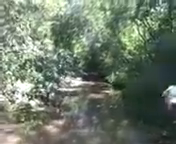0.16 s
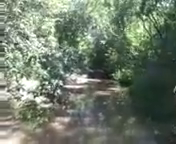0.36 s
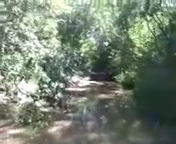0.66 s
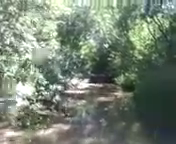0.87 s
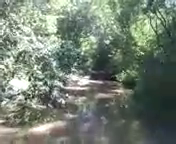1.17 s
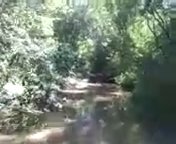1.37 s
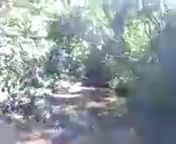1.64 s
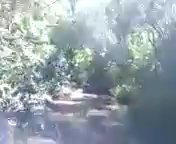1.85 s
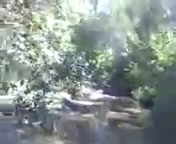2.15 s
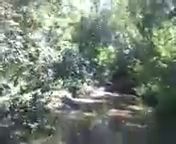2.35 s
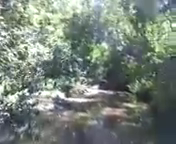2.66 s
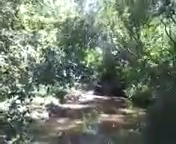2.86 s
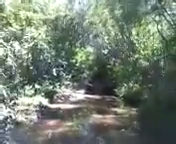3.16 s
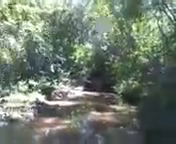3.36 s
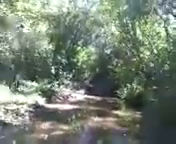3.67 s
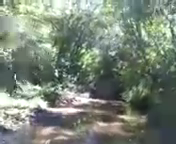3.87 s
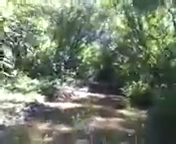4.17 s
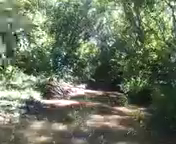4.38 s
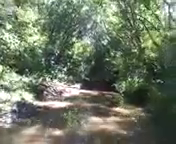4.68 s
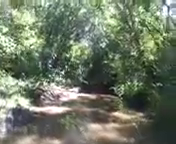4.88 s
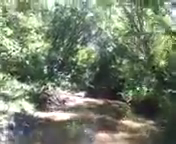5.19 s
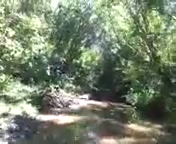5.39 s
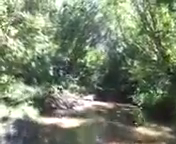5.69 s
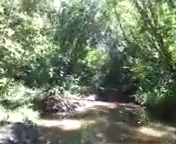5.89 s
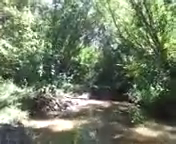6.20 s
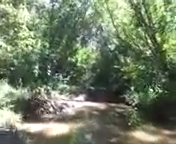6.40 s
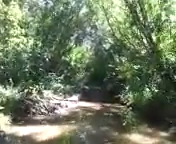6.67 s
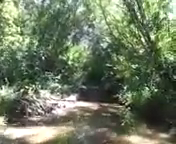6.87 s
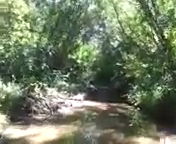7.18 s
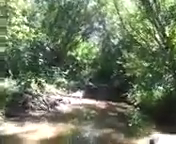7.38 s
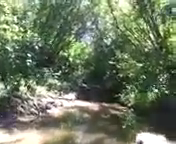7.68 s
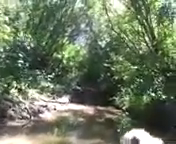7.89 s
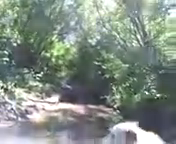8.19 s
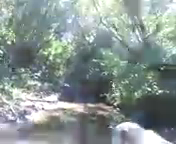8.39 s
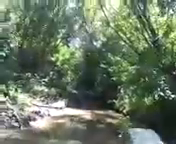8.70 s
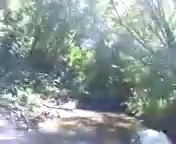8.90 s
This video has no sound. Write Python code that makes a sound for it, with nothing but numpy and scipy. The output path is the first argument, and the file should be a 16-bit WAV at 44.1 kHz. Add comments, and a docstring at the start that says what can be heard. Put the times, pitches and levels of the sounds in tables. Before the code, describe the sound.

Close, irregular splashes sound as feet and paws step through shallow water in a wooded creek. Each step slaps the surface, gurgles and throws drops that patter back. After about four seconds the wading turns into denser, louder sloshing, and soon gusts of wind buffet the microphone with low rumbles. A soft hiss of water and leaves lies underneath.

```python
"""A shallow creek in the woods, with paws and feet wading through it.
Each step slaps the water and traps air, which rings as bubbles or gulps as a hole closes.
Dragging legs churn the water and throw up spray that patters back down.
Behind them the creek and the leaves hiss, and wind buffets and thumps a small camera's microphone."""
import sys
import numpy as np
from scipy import signal
from scipy.fft import rfft, irfft, next_fast_len
from scipy.io import wavfile
from scipy.ndimage import uniform_filter1d, map_coordinates

SR = 44100
rng = np.random.default_rng(int(sys.argv[2]) if len(sys.argv) > 2 else 0)


def digitize_waveform(pressure):
    """Quantize a signal to 16-bit integers and store it at the path in sys.argv[1].

    Rows of a 2-D input are taken as channels; values are limited to [-1, 1].
    """
    field = np.atleast_2d(pressure).T
    bounded = np.clip(field, -1, 1)
    quanta = np.round(bounded * 32767).astype(np.int16)
    wavfile.write(sys.argv[1], SR, quanta)


N = 399105

# Water hitting water: start_s, level_db, spatter_db (compared with the slap)
SLAPS = [(0.316, -24, -11), (0.473, -32, 2.5), (1.0504, -20, -7), (1.068, -13.5, 0), (1.201, -24, -3),
         (1.2674, -23, -12), (1.287, -16, -5), (1.316, -25, -15), (1.342, -21, -1.5), (1.39, -30.5, -16),
         (1.7446, -6.5, -8), (1.934, -13.5, -5.5), (2.232, -34, 5), (2.688, -26.5, -16), (2.8563, -21, -15),
         (3.324, -35, -5), (4.0598, -10, -11), (4.1365, -21, -8), (4.3338, -14.5, -7), (4.3883, -25, -10),
         (4.3984, -17, -14), (4.4474, -26, -8), (4.47, -20, 4), (4.6455, -42, -11), (4.705, -29, -16),
         (4.72, -26, -8), (4.7414, -20, -22), (4.8278, -23, 1), (4.9466, -17.5, 0), (4.999, -17, -13),
         (5.04, -18, 1), (5.19, -19, -8), (5.2306, -15.5, 3), (5.367, -13, -25), (5.4836, -13.5, -3),
         (5.616, -24.5, -23), (5.666, -23.5, -19), (5.698, -23, 3), (6.1123, -24, -5), (6.141, -22, -18),
         (6.162, -14.5, -2), (6.1875, -19.5, 2), (6.227, -13, -9), (6.6027, -14.5, 3.5),
         (6.7041, -9.5, -19), (6.8134, -26, -12), (6.95, -13.5, -7), (7.121, -22, -23),
         (7.1528, -18.5, -24), (7.1982, -8.5, -19), (7.5248, -27, -1), (7.568, -17.5, -8),
         (7.871, -8.5, -23), (8.2227, -23.5, -4), (8.264, -30, -3), (8.4445, -43, 25), (8.5847, -15.5, -4),
         (8.6274, -11.5, -16), (8.649, -18, -14), (8.735, -22.5, 2.5), (9.0337, -27, -9)]
# Short ringing notes: bubbles in the water, and a few low thumps of wind on the microphone:
# start_s, pitch_hz, level_db, life_cycles
BUBBLES_AND_THUMPS = [(0.33, 1450, -37, 12.8), (1.07, 3240, -24, 11), (1.146, 379, -35, 3.4),
                      (1.171, 3614, -23, 12), (1.1801, 723, -30, 11), (1.205, 470, -28, 3.7),
                      (1.235, 2000, -29, 8), (1.262, 1690, -20.5, 13.4), (1.267, 1130, -20.5, 5.8),
                      (1.288, 397, -24, 1.7), (1.2895, 2380, -23, 8.6), (1.3183, 4106, -26, 7),
                      (1.3427, 1100, -15, 8.3), (1.744, 3000, -12.5, 13), (1.747, 4480, -9, 7.5),
                      (1.774, 1110, -36, 7.2), (1.7772, 3550, -31, 20), (1.852, 960, -36, 4.3),
                      (1.866, 900, -37, 6.3), (1.913, 826, -32, 5), (1.9286, 1610, -14.5, 2.9),
                      (1.9391, 700, -22.5, 3.2), (1.9491, 3270, -25, 6.4), (1.961, 564, -31, 5.5),
                      (1.978, 1240, -27.5, 4), (2.036, 1930, -35, 10), (2.07, 1980, -32.5, 13),
                      (2.086, 1290, -28, 5), (2.119, 1020, -31, 5.4), (2.1573, 610, -26.5, 1.8),
                      (2.2363, 1110, -32.5, 4.5), (2.513, 1830, -28.5, 14), (2.6872, 1090, -20.5, 2.1),
                      (2.689, 3600, -22.5, 3.2), (2.819, 1210, -19, 1.8), (2.823, 431, -28.5, 9.5),
                      (2.855, 255, -32.5, 1.8), (2.879, 795, -25, 7.5), (2.9733, 830, -25.5, 2.7),
                      (3.074, 2920, -26.5, 12), (3.1414, 3259, -26.5, 5.3), (3.3158, 1730, -13.5, 3.1),
                      (3.325, 1346, -17.5, 6), (3.344, 2420, -20, 3.2), (3.5333, 946, -31, 12),
                      (3.5421, 3700, -18.5, 5.5), (3.555, 1420, -22, 7.6), (3.582, 323, -23, 4.6),
                      (3.5808, 590, -20.5, 6.9), (3.584, 1960, -19, 7.3), (3.602, 257, -29, 2.2),
                      (3.605, 1060, -22, 3.3), (3.6595, 1680, -24, 5.7), (3.867, 1270, -29, 6.5),
                      (3.879, 1280, -21.5, 6.8), (3.9195, 500, -23, 2.4), (3.94, 555, -31.5, 15),
                      (4.058, 4200, -23, 6.5), (4.135, 1580, -17, 3), (4.1885, 420, -19, 2.27),
                      (4.3719, 266, -29, 3.2), (4.417, 1380, -23, 6), (4.436, 924, -23, 6.8),
                      (4.4652, 1510, -18, 3.6), (4.4731, 740, -25, 4.1), (4.563, 1720, -22, 4.7),
                      (4.67, 416, -18, 2.3), (4.719, 2780, -14.5, 12), (4.7429, 5180, -10.5, 8.6),
                      (4.7425, 2300, -16, 3.1), (4.9493, 1490, -19.5, 12.5), (5.003, 1790, -12, 5.1),
                      (5.1924, 2600, -11, 3), (5.276, 3670, -23, 10.8), (5.3475, 908, -13.5, 8.3),
                      (5.3653, 392, -29, 2.2), (5.4721, 960, -24.5, 6.1), (5.49, 4988, -35, 6.5),
                      (5.5482, 423, -31.5, 11.3), (5.552, 4780, -20, 15), (5.562, 734, -26, 2.9),
                      (5.629, 543, -31, 9.5), (5.6693, 2340, -16.5, 6.7), (5.726, 1830, -18, 4.8),
                      (5.858, 2400, -23, 4.9), (5.9005, 1600, -25, 8.8), (5.965, 191, -32, 1.2),
                      (5.987, 1350, -27.5, 7.6), (6.001, 233, -22, 0.85), (6.1425, 1540, -15.5, 3.4),
                      (6.249, 188, -22.5, 1.32), (6.2638, 820, -26, 4.1), (6.3168, 2170, -22, 9.8),
                      (6.35, 3375, -25, 4.3), (6.376, 3150, -23, 6.4), (6.437, 680, -22, 2.3),
                      (6.472, 1410, -27, 8.7), (6.5162, 615, -15.5, 3.48), (6.535, 706, -15, 2.5),
                      (6.6104, 2260, -12.5, 6.5), (6.615, 1230, -14, 3.7), (6.631, 1120, -19, 7.9),
                      (6.707, 3560, -10.5, 12), (6.787, 625, -17, 1.44), (6.9425, 1590, -12.5, 4.4),
                      (6.9497, 3120, -28, 16.1), (6.9487, 186, -25.5, 3.8), (6.9722, 3658, -24, 7.3),
                      (7.123, 3580, -6.5, 2.44), (7.1627, 625, -17.5, 3.1), (7.1763, 2620, -26, 12),
                      (7.1976, 1220, -10.5, 4.6), (7.1986, 2250, -15.5, 8.4), (7.1996, 184, -24.5, 4.55),
                      (7.1999, 5330, -8.5, 12), (7.246, 980, -15.5, 3.76), (7.354, 1820, -28, 9.7),
                      (7.473, 930, -22, 9.6), (7.553, 398, -14.5, 2.8), (7.5668, 436, -14.5, 2.9),
                      (7.57, 1840, -8.5, 3.1), (7.5738, 5000, -25, 8.3), (7.632, 275, -29.5, 3.5),
                      (7.866, 195, -23.5, 2.3), (7.8749, 4640, -22, 14), (7.891, 830, -16, 1.6),
                      (7.9944, 3550, -23, 14), (8.026, 1120, -19, 7), (8.0475, 2800, -20.5, 7.7),
                      (8.0592, 802, -25.5, 11), (8.162, 295, -28.5, 4.2), (8.222, 3070, -26, 12),
                      (8.234, 458, -23.5, 4), (8.2645, 4050, -23.5, 11), (8.3413, 2080, -27, 7.8),
                      (8.348, 476, -29, 2.6), (8.5148, 1013, -23.5, 14), (8.603, 500, -21, 7.1),
                      (8.614, 1390, -21, 7.3), (8.6285, 2020, -19, 7.7), (8.6316, 293, -20, 3.74),
                      (8.738, 3860, -17, 6.7), (8.783, 2180, -23, 5.6), (8.9594, 523, -24, 4.9),
                      (8.98, 530, -26, 4.1), (9.034, 2060, -16.5, 7.2)]
# Drops falling back in: start_s, pitch_hz, level_db
DRIPS = [(1.9004, 2870, -30), (2.0478, 4000, -29), (2.2351, 3850, -28), (2.306, 2620, -37),
         (2.3391, 3390, -36), (2.365, 5300, -28), (2.406, 3340, -37), (2.4429, 5310, -29),
         (3.251, 4700, -24), (4.71, 2880, -24), (6.2938, 5300, -18.5)]
# Holes closing behind a leg: start_s, length_s, first_hz, last_hz, level_db
GULPS = [(1.199, 0.069, 405, 1570, -36.5), (1.329, 0.021, 500, 910, -32.5), (3.035, 0.023, 745, 1380, -29),
         (6.257, 0.033, 710, 1820, -33.5), (6.407, 0.027, 520, 915, -37), (7.177, 0.0077, 2340, 3600, -27)]
# Legs dragged through the water: peak_s, length_s, churn_db, spray_db
SLOSHES = [(0.334, 0.1, -49.5, -46), (1.087, 0.053, -61, -33.5), (1.175, 0.058, -35, -37),
           (1.28, 0.055, -32.5, -39.5), (1.35, 0.084, -40, -37.5), (1.78, 0.021, -61, -30),
           (1.923, 0.098, -38.5, -40.5), (2.124, 0.23, -46, -61), (2.525, 0.093, -62, -36),
           (2.696, 0.022, -33, -33), (2.84, 0.15, -40.5, -44.5), (2.987, 0.056, -35.5, -42),
           (3.09, 0.15, -39, -64), (3.325, 0.045, -35.5, -31), (3.548, 0.22, -40, -34.5),
           (3.863, 0.078, -40, -41), (3.936, .12, -35.5, -55), (4.08, 0.041, -38.5, -52),
           (4.163, 0.19, -36.5, -40), (4.402, 0.098, -29, -35), (4.462, 0.05, -29, -27.5),
           (4.654, 0.069, -36.5, -58), (4.724, 0.045, -30.5, -30), (4.928, 0.13, -51, -33),
           (5.013, 0.067, -39, -26), (5.197, 0.073, -41, -30.5), (5.281, 0.072, -32, -30.5),
           (5.356, 0.028, -32.5, -27), (5.867, 0.061, -35, -29), (6.045, 0.037, -35.5, -35.5),
           (6.133, 0.1, -43, -32), (6.2, 0.057, -36, -40), (6.328, 0.11, -44, -29), (6.473, 0.13, -39, -57),
           (6.539, 0.056, -35, -30.5), (6.623, 0.077, -31.5, -30.5), (6.73, 0.2, -37, -31.5),
           (6.785, 0.25, -33, -31), (6.947, 0.027, -29.5, -29), (7.05, 0.081, -54, -31),
           (7.252, 0.037, -30, -34), (7.398, 0.2, -27.5, -41.5), (7.568, 0.046, -26.5, -24.5),
           (7.624, 0.25, -30.5, -38.5), (7.81, 0.43, -35, -30.5), (7.88, 0.044, -29, -35),
           (7.974, 0.033, -53, -27), (8.093, 0.21, -31, -44), (8.236, 0.081, -39, -43),
           (8.368, 0.064, -33, -48), (8.624, 0.29, -26, -30.5), (9.045, 0.25, -31.5, -34)]
# Water still moving between strides: time_s, churn_db, spray_db
RESTLESS_WATER = [(0, -55.5, -57), (1.0, -57, -53.5), (1.7, -53.5, -54.5), (2.1, -52.5, -46),
                  (2.9, -49.5, -51.5), (3.3, -52, -36.5), (3.8, -51.5, -50), (4.3, -35, -36),
                  (4.6, -48, -36), (4.9, -33.5, -45), (5.42, -51.5, -44), (5.75, -39.5, -36.5),
                  (6.3, -55, -45), (6.85, -36, -36.5), (7.5, -51, -39.5), (7.95, -43, -65),
                  (8.3, -33, -36.5), (9.05, -49.5, -49)]
# Puffs of wind on the microphone: peak_s, length_s, level_db
PUFFS = [(0.225, 0.099, -50), (1.31, 0.055, -55), (3.975, 0.056, -50), (4.26, .14, -54), (4.914, 0.15, -50),
         (5.113, 0.13, -49), (5.526, 0.077, -31.5), (5.654, 0.3, -35.5), (5.907, 0.04, -28.5),
         (6.081, 0.069, -31.5), (6.234, 0.11, -36), (6.366, 0.06, -37), (6.593, 0.11, -23),
         (6.882, 0.056, -38), (6.974, 0.18, -40), (7.26, 0.33, -45), (7.43, 0.087, -41),
         (7.814, 0.061, -33.5), (7.944, 0.072, -31), (8.032, .06, -37), (8.1, 0.093, -36.5),
         (8.505, 0.016, -36), (8.538, 0.035, -33), (8.827, 0.12, -27), (8.918, 0.048, -24)]

# The tone of each noise, from bass to treble: frequency_hz, relative_db
SLAP_TONE = [(250, -15.5), (700, -5.5), (2000, -3), (3500, 2.5), (5500, 2.5), (7500, -7), (16000, -16.5)]
CHURN_TONE = [(120, -34), (250, -6), (500, -0.5), (1200, 0), (2500, -3), (5000, -29)]
SPRAY_TONE = [(600, -30), (1500, -4.5), (3000, -2), (5300, -1), (7000, -9.5), (10000, -15.5), (16000, -18)]
RUMBLE_TONE = [(20, -36), (35, -18), (60, -0.5), (110, -3), (200, -15.5), (400, -27), (800, -42)]
FLAP_TONE = [(60, -39), (130, 6), (250, -3), (400, -6), (900, -49)]  # the edge of strong puffs
WOODS_TONE = [(120, -10.5), (200, -8.5), (273, -6.5), (416, -8.5), (647, -16), (3190, -14), (5330, -10.5),
              (16000, -33)]


def slaps():
    """Water hits water: a sharp snap, a short crack and a grainy spatter that swells and dies."""
    hits, t = np.zeros(N + SR), np.arange(SR // 4) / SR
    crack = np.exp(-(t / 0.0021) ** 2)
    for start_s, db, spatter_db in SLAPS:
        start = round(start_s * SR)
        spatter = amp(spatter_db - 60 * t / 0.088) * (1 - np.exp(-t / 0.0091))
        hits[start:][:len(t)] += amp(db) / 2 * (crack + spatter) * rng.standard_normal(len(t))
        hits[start] += 0.32 * amp(db)  # the snap
    grain = amp(1.06 * wobble(300) + 1.32 * wobble(1200))
    return coloured(hits[:N] * grain, SLAP_TONE)


def bubbles_and_thumps():
    """Bubbles ring and wind thumps the microphone a few times; three softer notes trail each one."""
    start_s, hz, db, cycles = np.transpose(BUBBLES_AND_THUMPS)
    out = ring(start_s, hz, amp(db), cycles, rise=0.045, samples=3000)
    for delay, detune, loudness in rng.standard_normal((len(hz), 3, 3)).transpose(1, 2, 0):
        trail_s = start_s + 0.9 * np.abs(delay) * cycles / hz
        trail_hz = hz * 2 ** (0.29 * detune)
        out += ring(trail_s, trail_hz, amp(db - 12 + 2.5 * loudness), cycles, rise=0.22, samples=3000)
    return out


def drips():
    """Single drops fall back into the creek with a high plink."""
    start_s, hz, db = np.transpose(DRIPS)
    return ring(start_s, hz, amp(db), cycles=np.full_like(hz, 8), rise=0.2, samples=600)


def gulps():
    """A hole in the water shrinks behind a leg, so its pitch sweeps up."""
    out = np.zeros(N)
    for start_s, length_s, first_hz, last_hz, db in GULPS:
        progress = np.arange(round(length_s * SR)) / (length_s * SR)
        hz = first_hz * (last_hz / first_hz) ** progress ** 1.35
        shape = np.sin(np.pi * progress) ** 0.32
        out[round(start_s * SR):][:len(hz)] += amp(db) * shape * np.sin(2 * np.pi * np.cumsum(hz) / SR)
    return out


def wading():
    """Legs stir the water into gurgles; drops thrown up patter back."""
    peak_s, length_s, churn_peaks, spray_peaks = np.transpose(SLOSHES)
    churn_floor, spray_floor = curves(RESTLESS_WATER)
    churn_db = swells(peak_s, length_s, churn_peaks, rise_db=20.5, fall_db=14, floor_db=churn_floor)
    spray_db = swells(peak_s, length_s, spray_peaks, rise_db=20.5, fall_db=14, floor_db=spray_floor)
    surge = wobble(25)  # moves churn and spray together
    gurgle = swarm(count=4000, hz=1098, octaves=0.673, cycles=6.08, rise=0.38, spread_db=2.5, samples=700)
    churn = 0.64 * gurgle + 0.59 * rush(CHURN_TONE, patchy_db=3)
    patter = swarm(count=3000, hz=3580, octaves=0.675, cycles=5.5, rise=0.16, spread_db=3.5, samples=160)
    click_here = rng.random(N) < 300 / SR  # about 300 a second
    clicks = click_here * amp(0.64 * rng.standard_normal(N)) * rng.standard_normal(N)
    spray = 0.49 * patter + 0.21 * unit(coloured(clicks, SPRAY_TONE))
    spray += 0.75 * rush(SPRAY_TONE, patchy_db=1.5)
    churn_gain = amp(churn_db + 1.27 * surge + 1.62 * wobble(50))
    spray_gain = amp(spray_db + 0.63 * surge + 1.95 * wobble(90))
    return churn_gain * churn + spray_gain * spray


def echoes(sound):
    """Sound bounces briefly off the banks and tree trunks."""
    t = np.arange(SR // 5) / SR
    tail = rng.standard_normal(len(t)) * amp(-60 * t / 0.053) * (t > 0.003)
    return signal.fftconvolve(sound, tail / np.linalg.norm(tail))[:N]


def wind():
    """Wind pushes on the microphone with a lumpy rumble; strong puffs add a higher flapping."""
    puff_db = swells(*np.transpose(PUFFS), rise_db=16, fall_db=20.5, floor_db=-67)
    flap_db = -47 + 2.54 * (np.minimum(puff_db, -26) + 34)  # puffs above -26 dB flap no harder
    lumps = amp(3.1 * wobble(25)) * rng.standard_normal(N)
    flaps = amp(4 * wobble(40)) * rng.standard_normal(N)
    rumble = amp(puff_db) * unit(coloured(lumps, RUMBLE_TONE))
    return rumble + amp(flap_db) * unit(coloured(flaps, FLAP_TONE))


def woods():
    """The creek and the leaves hiss softly in the background."""
    return amp(-51) * rush(WOODS_TONE, patchy_db=1.5)


def ring(start_s, hz, gain, cycles, rise, samples):
    """Short notes start softly and die away, rising in pitch like a bubble nearing the surface."""
    positions = np.round(start_s * SR).astype(int)[:, None] + np.arange(samples)
    turns = np.arange(samples) / SR * hz[:, None]
    age = turns / np.maximum(cycles, 0.5)[:, None]
    shape = 4 * age * np.exp(1 - 4 * age)
    notes = gain[:, None] * shape * np.sin(2 * np.pi * turns * (1 + rise * (age / 2 - 0.25)))
    return np.bincount(positions.ravel(), notes.ravel(), N + samples)[:N]  # add each note in its place


def swarm(count, hz, octaves, cycles, rise, spread_db, samples):
    """A steady crowd of random bubbles, a few much louder than the rest."""
    when, loudness = rng.random((count, 2)).T
    detune, life = rng.standard_normal((count, 2)).T
    pitch_hz = np.clip(hz * 2 ** (octaves * detune), 200, 15000)
    gain = amp(-spread_db * np.log(1 - 0.995 * loudness))
    gain *= np.sqrt(np.minimum(pitch_hz / hz, 1))  # low notes are softer
    return unit(ring(when * N / SR, pitch_hz, gain, cycles * np.exp(0.33 * life), rise, samples))


def rush(tone, patchy_db):
    """Rushing noise with louder and softer patches across time and pitch."""
    spectrum = signal.stft(rng.standard_normal(N), nperseg=256)[2]
    patches = uniform_filter1d(rng.standard_normal(spectrum.shape), size=5, axis=0)
    patches = uniform_filter1d(patches, size=4, axis=1)
    noise = signal.istft(spectrum * amp(patchy_db * unit(patches)), nperseg=256)[1][:N]
    return unit(coloured(noise, tone))


def swells(peak_s, length_s, peak_db, rise_db, fall_db, floor_db):
    """A level in dB: above a floor, each swell gains rise_db per length, then loses fall_db per length."""
    steps = np.arange(0, N, 64)
    lengths_past = (steps / SR - peak_s[:, None]) / length_s[:, None]
    slope_db = np.where(lengths_past < 0, rise_db, -fall_db)
    swell_db = peak_db[:, None] + np.maximum(slope_db * lengths_past, -200)
    power = np.sum(amp(2 * swell_db), axis=0)
    return 10 * np.log10(amp(2 * floor_db) + np.interp(np.arange(N), steps, power))


def coloured(sound, tone):
    """Give a sound the bass and treble of a tone table."""
    tone_hz, tone_db = np.transpose(tone)
    hz = np.fft.rfftfreq(4096, 1 / SR)
    gain = amp(np.interp(np.log(hz + 1), np.log(tone_hz), tone_db))
    # Fold the filter so that it rings only after a hit, never before.
    folded = irfft(np.log(gain))
    folded[1:2048] *= 2
    folded[2049:] = 0
    response = unit(irfft(np.exp(rfft(folded)))) / 64
    return signal.fftconvolve(sound, response)[:N]


def wobble(per_second):
    """A smooth curve through this many random values a second."""
    values = rng.standard_normal(int(N * per_second / SR) + 4)
    return map_coordinates(values, [np.arange(N) * per_second / SR])


def curves(rows):
    """Join the dots over time for each column after the first."""
    time_s, *columns = np.transpose(rows)
    return [np.interp(np.arange(N) / SR, time_s, column) for column in columns]


def amp(db):
    """Turn decibels into a multiplier."""
    return 10 ** (np.asarray(db) / 20)


def unit(x):
    """Scale to an average strength (rms) of 1."""
    return x / np.sqrt(np.mean(x ** 2) + 1e-20)


def scene():
    """Short nearby sounds and their echoes, churning water, the wind and the woods."""
    nearby = slaps()
    nearby += (bubbles_and_thumps() + drips()) * amp(1.9 * wobble(400))  # the notes flutter
    nearby += gulps()
    background = woods()
    return (nearby + amp(-12.5) * echoes(nearby) + wading() + wind() + background)[None]


def record(dry):
    """The camera rounds off the tallest peaks and cuts the deepest bass and the highest treble."""
    ceiling, bottom_hz, top_hz = 0.75, 42, 16000
    rounded = dry / (1 + (dry / ceiling) ** 4) ** (1 / 4)
    size = next_fast_len(N + SR // 2)
    hz = np.fft.rfftfreq(size, 1 / SR)
    band = (hz < top_hz) / np.sqrt(1 + (bottom_hz / (hz + 1)) ** 8)
    return irfft(rfft(rounded, size) * band, size)[:, :N]


dry = scene()
out = record(dry)
digitize_waveform(out)
```